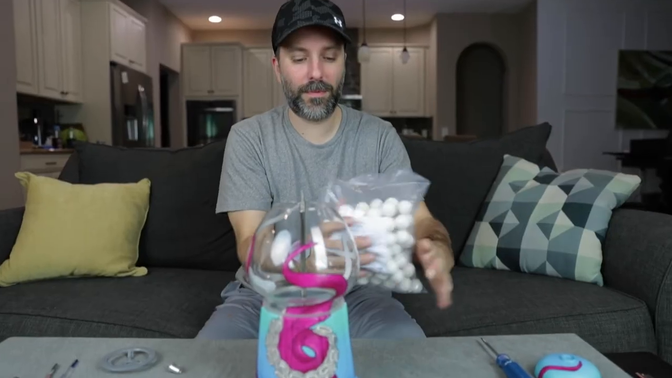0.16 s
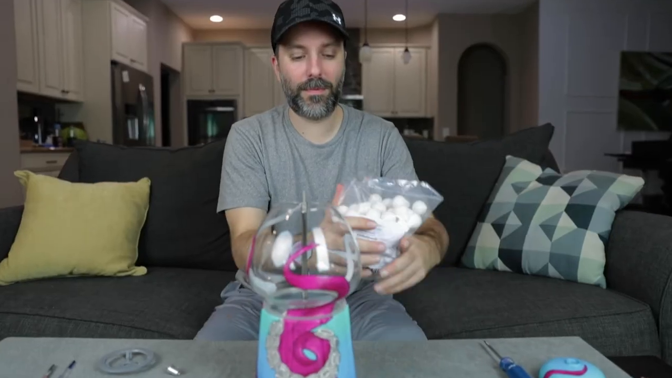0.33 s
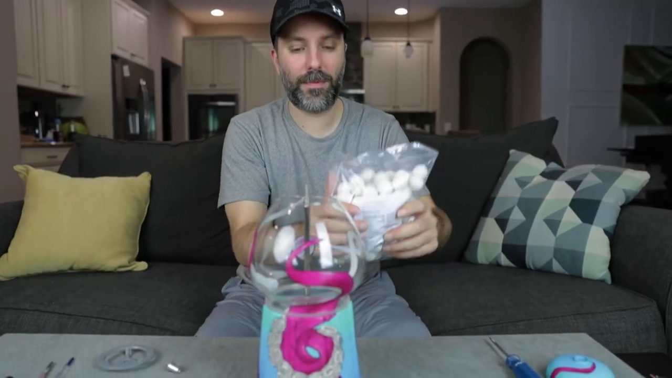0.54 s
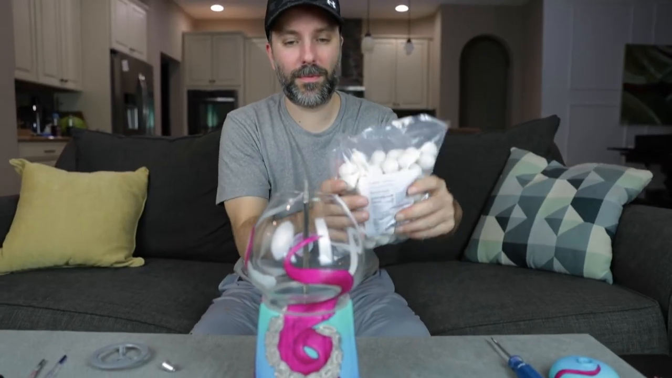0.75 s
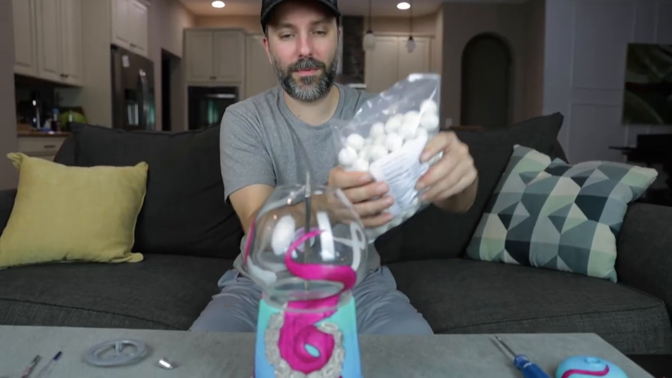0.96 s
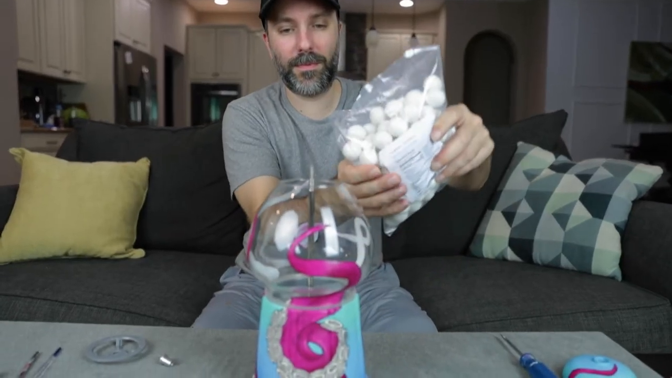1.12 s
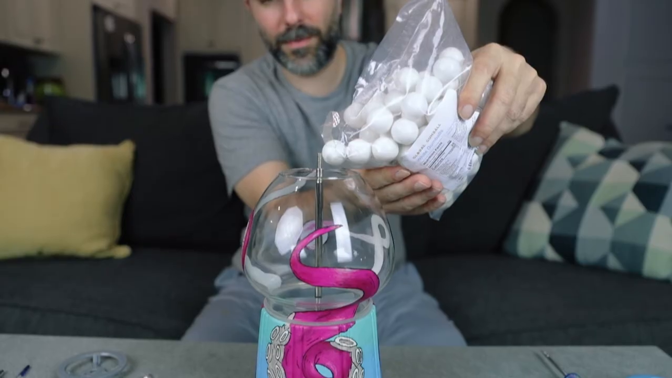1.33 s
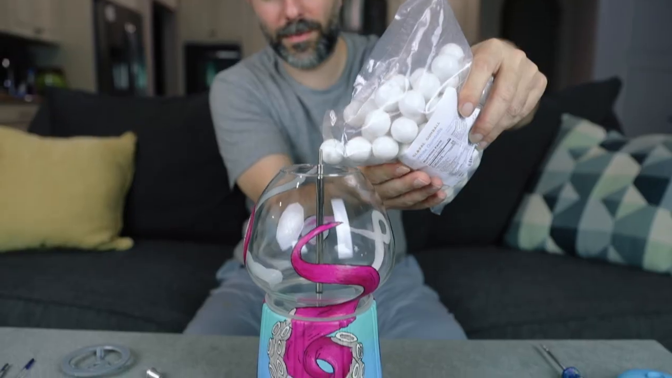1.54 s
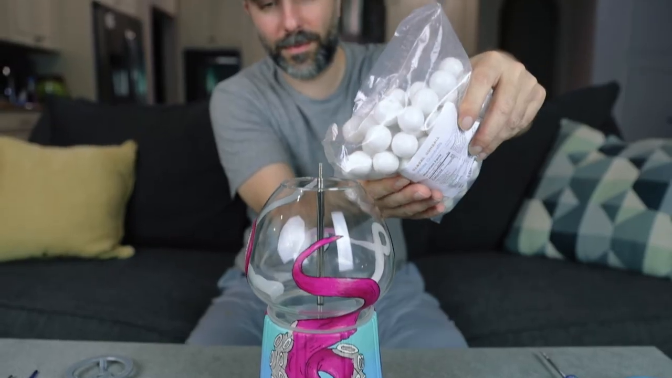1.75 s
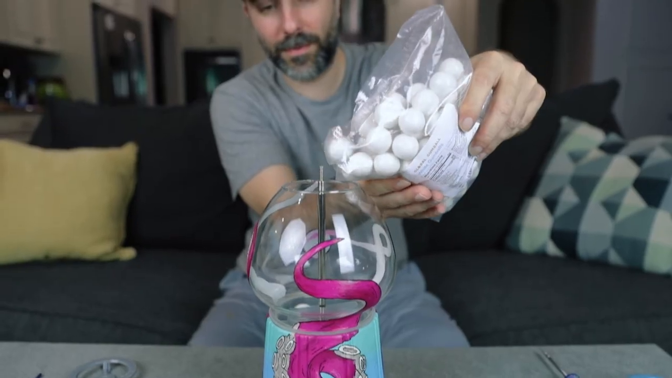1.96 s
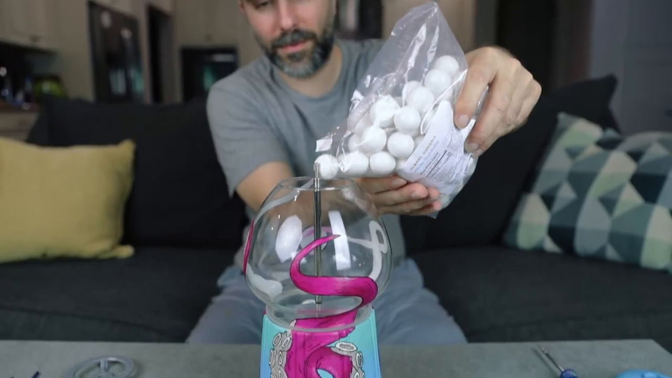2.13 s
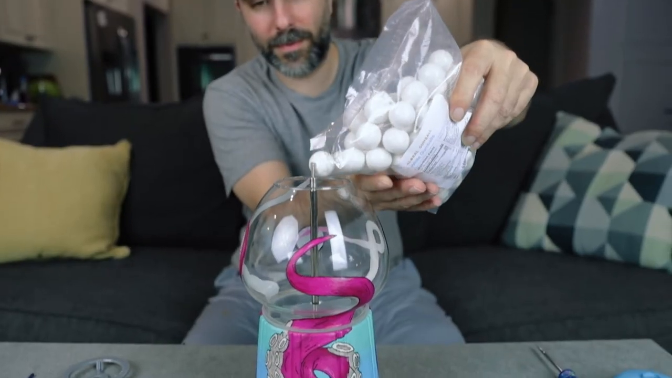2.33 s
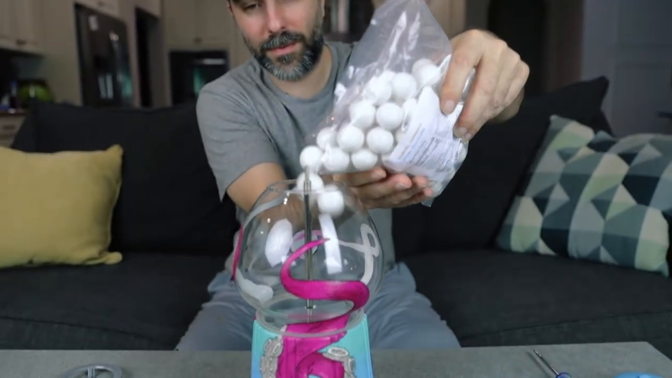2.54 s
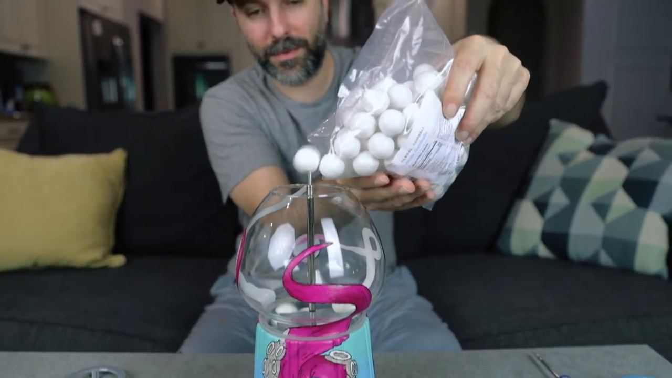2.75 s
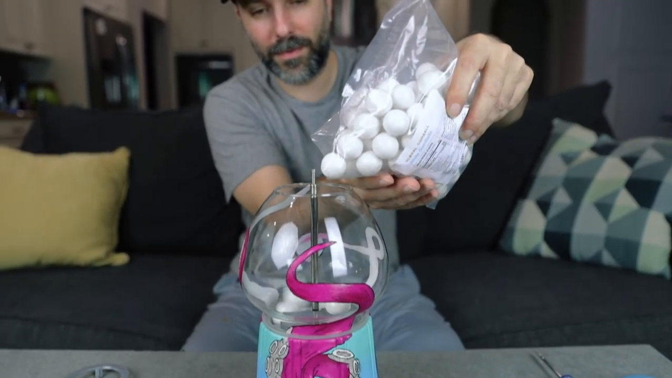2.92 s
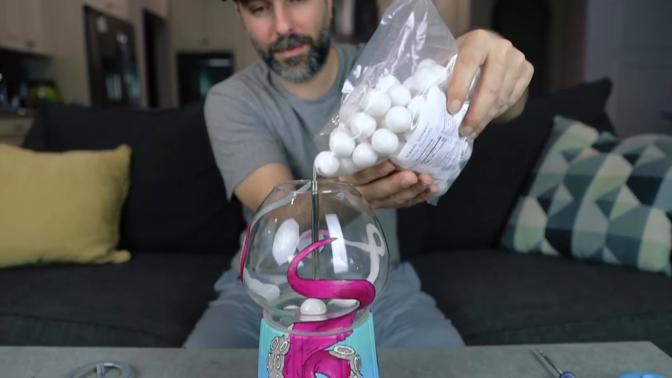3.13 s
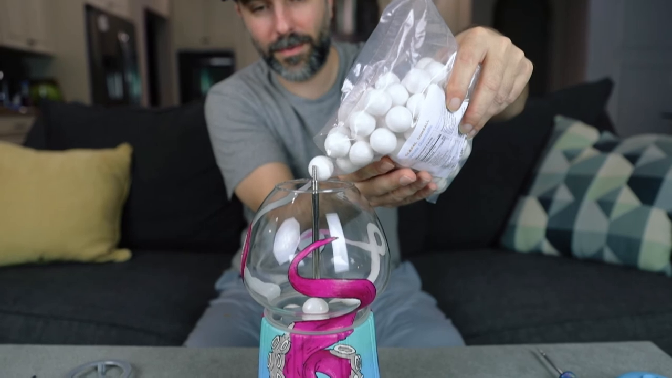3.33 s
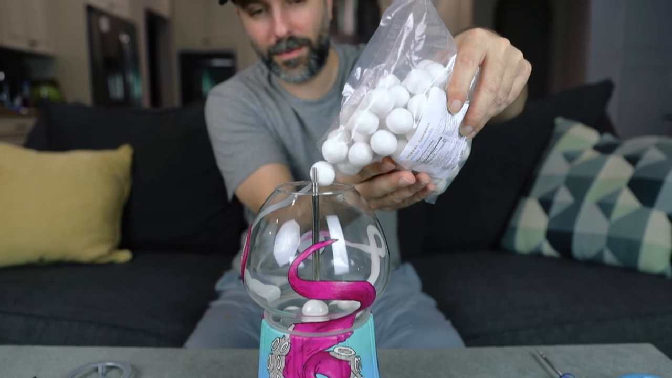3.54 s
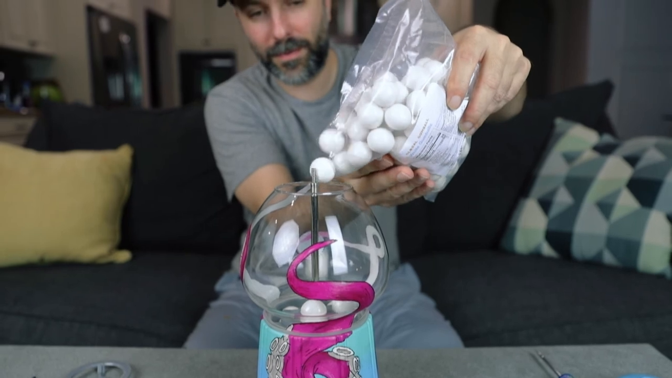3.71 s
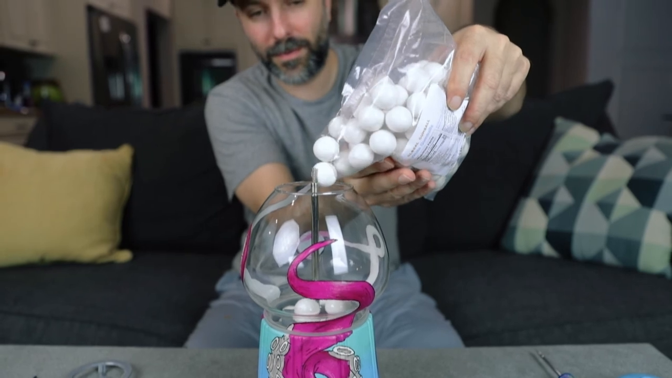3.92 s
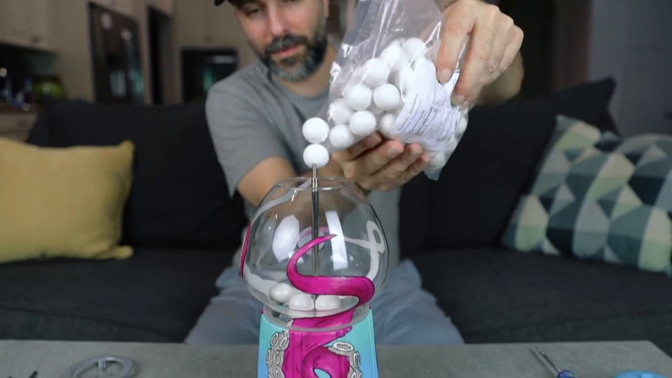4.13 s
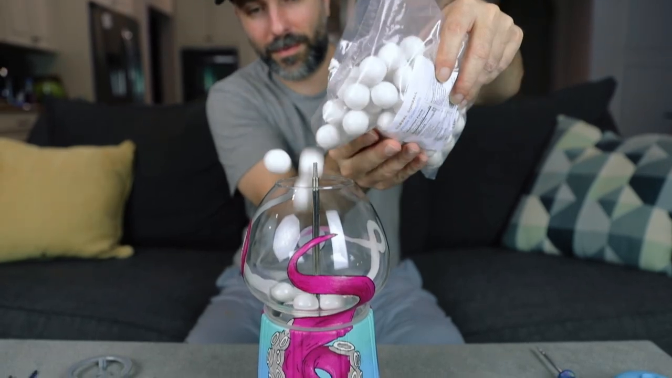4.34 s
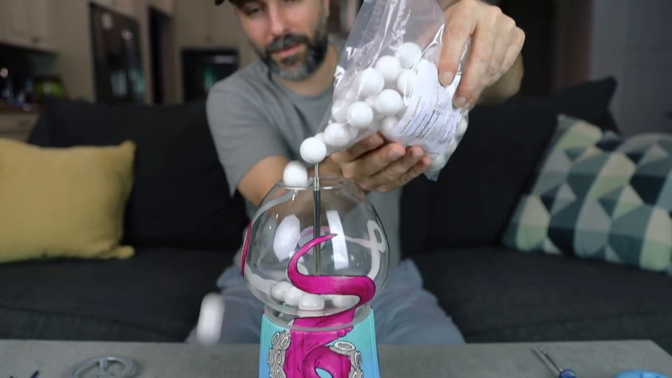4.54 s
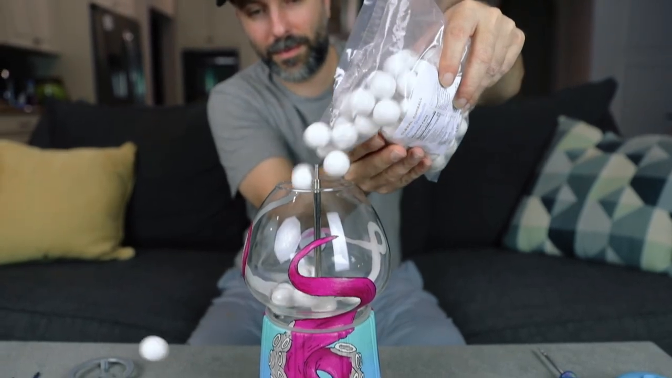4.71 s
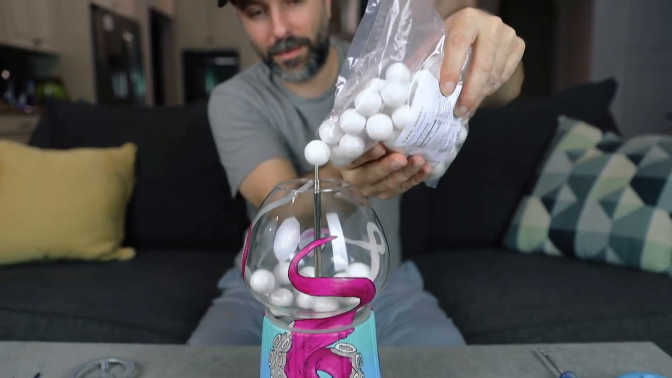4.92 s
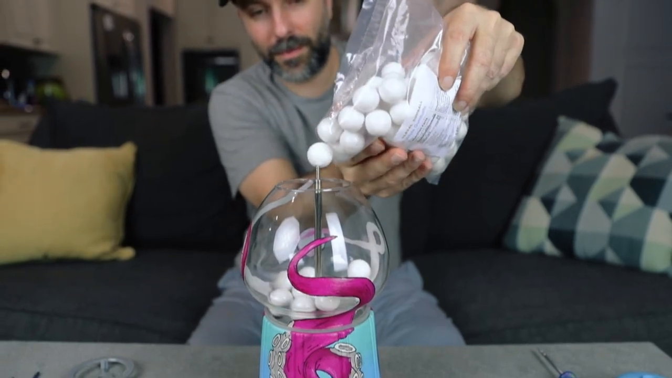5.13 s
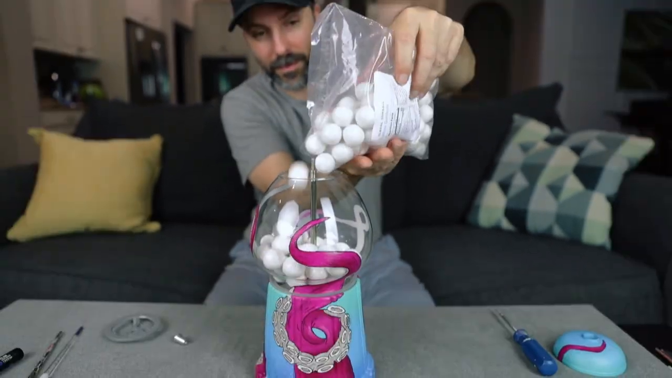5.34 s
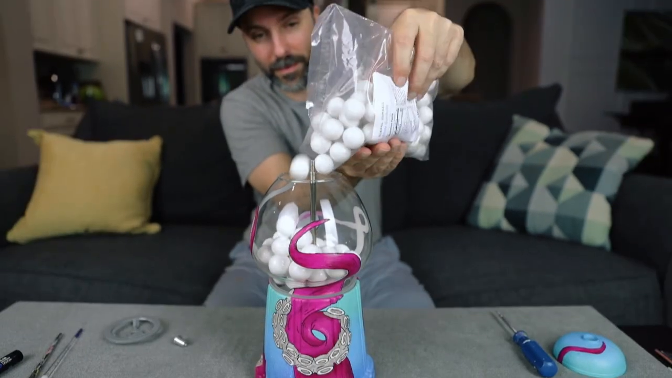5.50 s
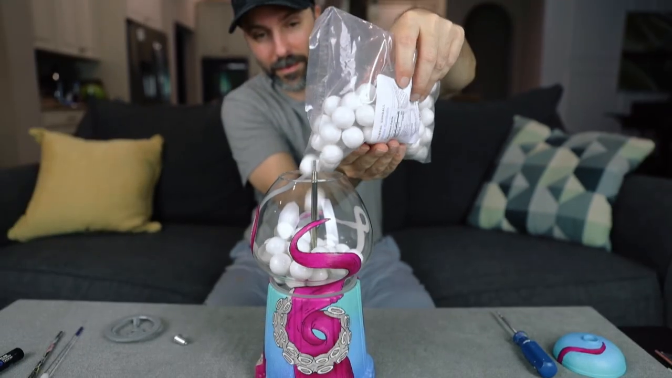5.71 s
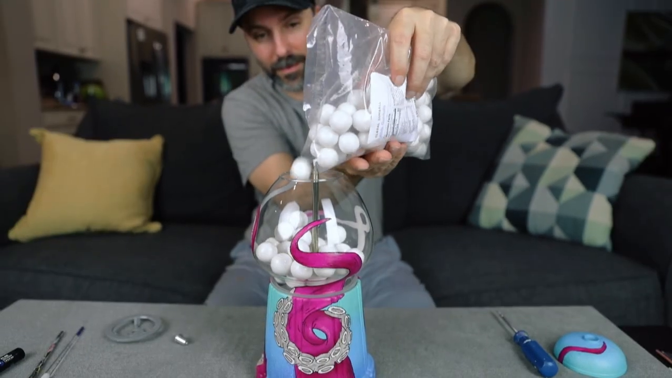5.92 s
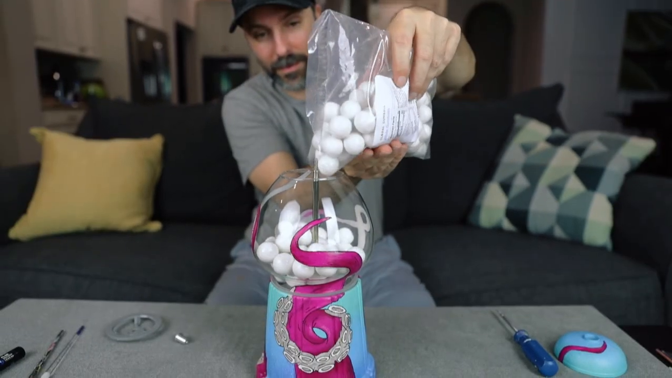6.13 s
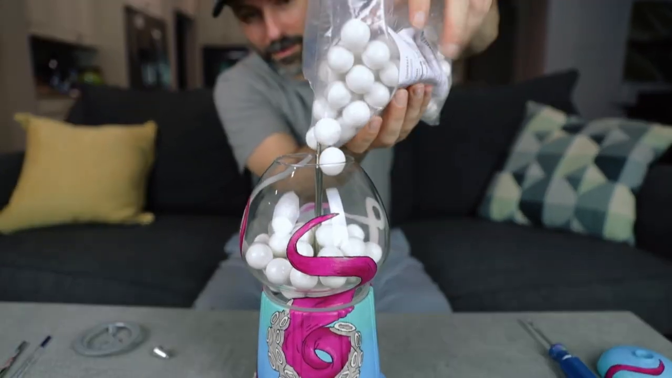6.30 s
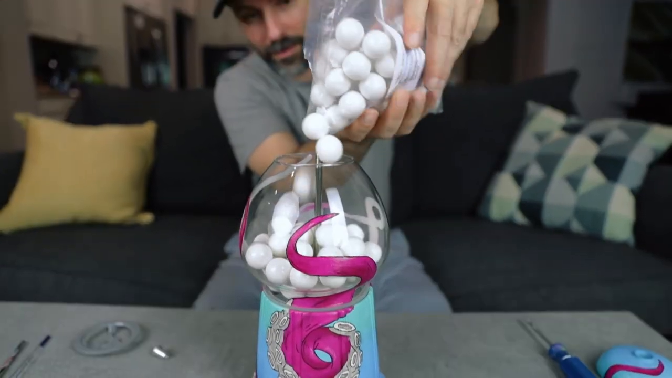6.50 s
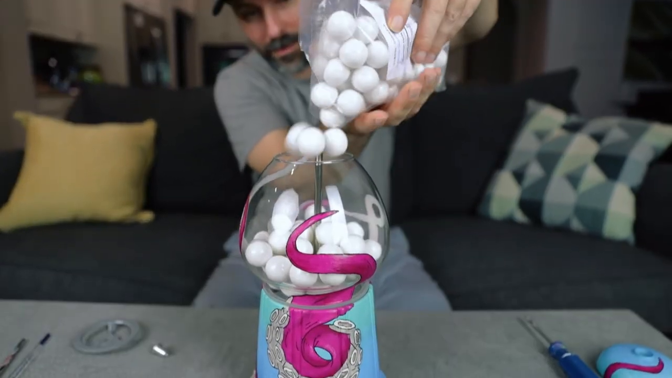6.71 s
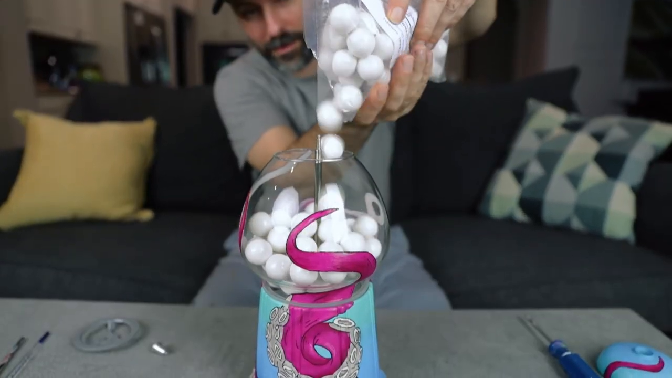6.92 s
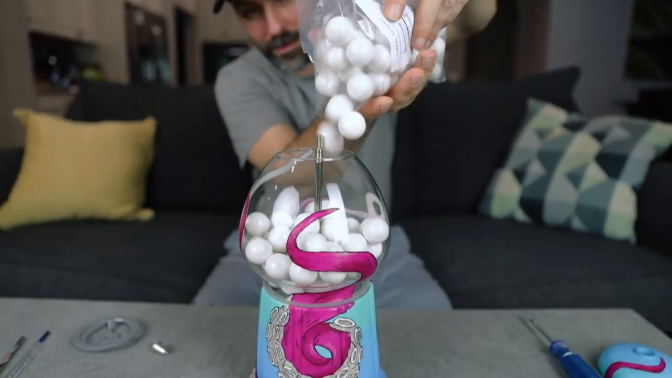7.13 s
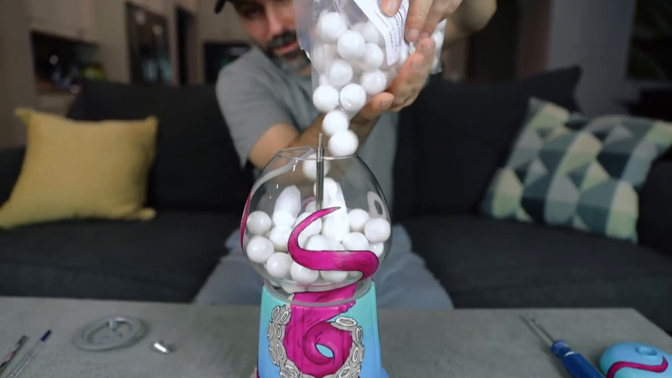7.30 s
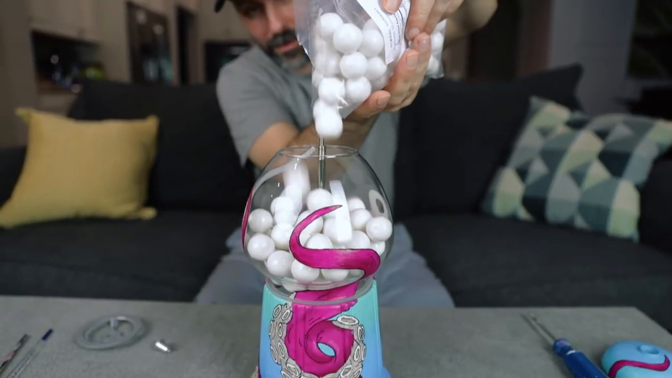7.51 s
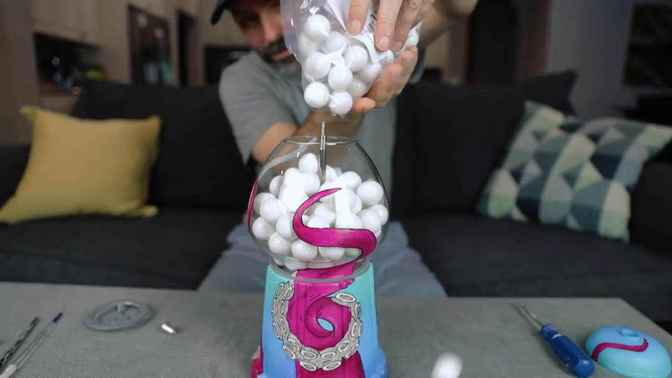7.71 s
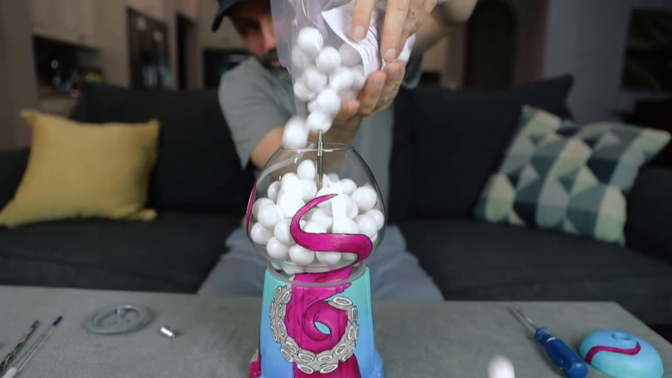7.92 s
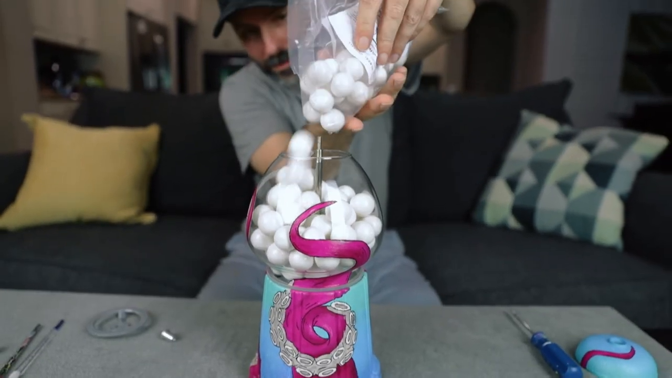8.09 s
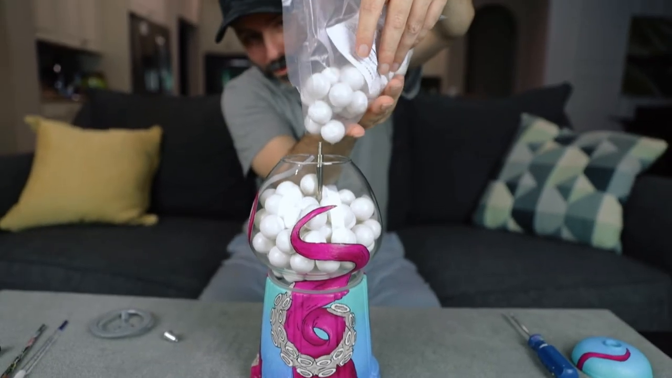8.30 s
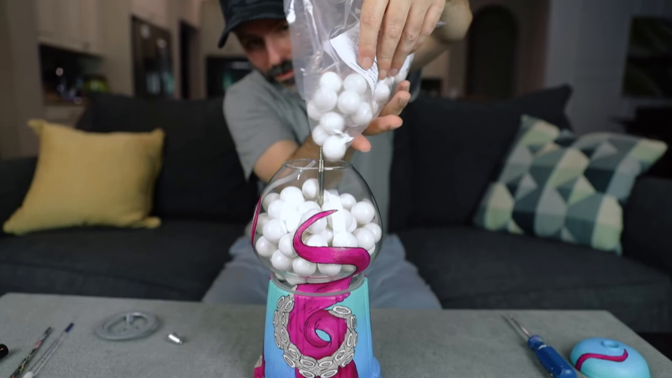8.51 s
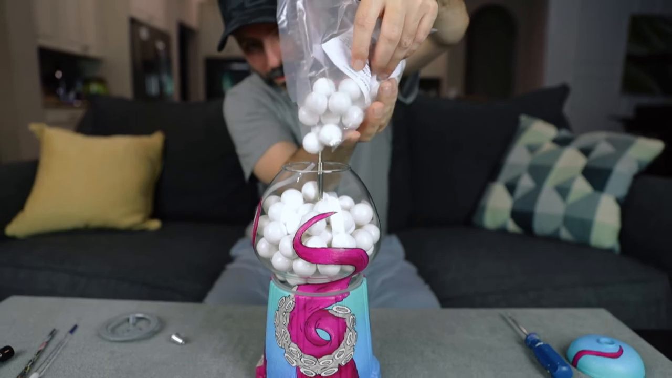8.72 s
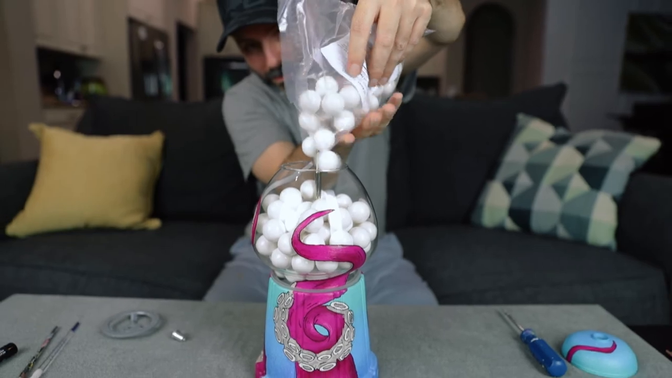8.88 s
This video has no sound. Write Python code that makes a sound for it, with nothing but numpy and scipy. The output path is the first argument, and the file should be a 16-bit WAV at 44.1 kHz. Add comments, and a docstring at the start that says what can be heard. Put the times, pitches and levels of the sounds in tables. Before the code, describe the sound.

Near microphone, modest room echo and faint hush. Film crinkles around jostling balls, then a few balls thump and clack onto the bare floor of a glass globe. Pouring becomes a fast irregular clatter with bell-like rim pings, each cut off by the next. A brief level dip comes before the first loud table bounce; a second stray follows late, as the fuller globe sounds drier and crackling plastic closes the scene.

```python
"""A bag of gumballs rustles and snaps in a living room: coloured noise driven by many tiny clicks.
From 1.9 s balls drop into a glass globe: clacks and glass modes, first with thumps of its plastic floor;
the growing heap damps the modes. Balls that hit the rim chime. The level dips briefly at 4.2 s.
At 4.7 s and 7.8 s stray balls bounce on the table, knocks loud enough to make the limiter duck."""
import sys
import numpy as np
from scipy import signal
from scipy.io import wavfile
from scipy.ndimage import uniform_filter1d

SR = 44100
rng = np.random.default_rng(int(sys.argv[2]) if len(sys.argv) > 2 else 0)


def wav_out(sig):
    """Save sig, one row per channel (or a flat mono array), as 16-bit PCM at SR to the path in sys.argv[1]."""
    wavfile.write(sys.argv[1], SR, np.round(np.clip(np.atleast_2d(sig).T, -1, 1) * 32767).astype(np.int16))


N = 394694
TIME = np.arange(N) / SR
BAND_EDGES_HZ = 22.2 * 2 ** (np.arange(20) / 2)

# Balls landing in the globe. Each row: start in s, blow on other balls in relative dB,
# blow on the glass in relative dB.
LANDINGS = [(1.871, -12, -17.5), (1.8823, -12.5, -12), (1.89, -8, -16.5), (1.952, -15.5, -23),
            (1.967, -20, -25), (2.0653, -21, -29.5), (2.3087, -23, -34), (2.7242, -2, -10),
            (2.779, -13, -22), (2.7909, -3.5, -14.5), (2.8302, -8.5, -11.5), (2.961, -15, -24),
            (2.9986, -8.5, -17), (3.007, -9, -16), (3.026, -16, -22), (3.0665, -12, -14),
            (3.3363, -21, -30), (3.5378, -26, -39), (3.8155, -11, -23), (3.8383, -11, -14),
            (3.892, -18, -33), (3.961, -21.5, -31), (4.0334, -22.5, -30.5), (4.476, -10, -17),
            (4.4863, -6, -15.5), (4.497, -7, -13), (4.5398, -5, -12.5), (4.5621, -6, -14.5),
            (4.6026, -7.5, -17), (4.7306, -0.5, -10), (4.7447, -12, -17), (4.796, -4, -9),
            (4.8572, -16, -15.5), (4.8959, -3, -12.5), (4.9339, -9, -8.5), (4.9581, 3, -4.5),
            (5.002, -12, -9.5), (5.0275, -4, -7.5), (5.0693, -6, -15.5), (5.0989, -14, -19),
            (5.249, -13, -25), (5.471, -8.5, -18.5), (5.4946, -4, -16.5), (5.658, -10, -14),
            (5.69, -12, -19.5), (5.7118, -12.5, -21), (5.7697, -13, -21.5), (5.8238, -8, -15.5),
            (5.8517, -12, -19.5), (5.879, -7.5, -11), (5.9267, -12, -19), (5.9478, -18, -17),
            (6.0718, -7, -15), (6.099, -9.5, -13), (6.1432, -12, -18.5), (6.175, -13.5, -22),
            (6.1915, -9, -19.5), (6.6127, -8, -15.5), (6.6343, -10.5, -24), (6.6797, -12.5, -20),
            (6.7079, -19, -17), (6.736, -12, -13), (6.873, -3, -16.5), (6.8925, -12, -16),
            (6.9042, -6, -10), (6.922, -13, -12.5), (6.984, -12, -15), (7.001, -8, -8.5),
            (7.081, -2.5, -12.5), (7.0967, -8, -13), (7.128, -14, -8.5), (7.1588, -16, -14.5),
            (7.2752, -9, -13), (7.2993, -16, -18), (7.3372, -4, -12.5), (7.3583, -15, -14.5),
            (7.4064, -7.5, -16), (7.452, -7.5, -16), (7.4641, -4, -8.5), (7.5308, -4, -10),
            (7.598, -3.5, -13), (7.658, -13, -12.5), (7.6853, -7, -17), (7.756, -8, -15), (8.1105, -9, -25),
            (8.1548, -15, -27), (8.1888, -11, -9.5), (8.2121, -14, -11.5), (8.2295, -12, -16),
            (8.2575, -24, -15.5), (8.286, -13, -17.5), (8.659, -8, -20), (8.6922, -8.5, -12)]
# How well a blow rings the bowl, poorly on the bare floor and on a high heap. Each row: time in s, gain in dB.
BOWL_RING = [(2.7, -12), (2.85, 1.5), (3.3, 5), (4.0, 5), (4.5, 1.5), (5.0, 6.5), (6.0, 1.5), (7.3, -2.5),
             (8.2, -13)]
# Modes of the bowl struck from within, of a sugar shell and of the stand. Each row: frequency in Hz,
# level in relative dB, undamped t60 in s, added decay in dB/s when full.
BOWL_MODES = [(1554, -11, 0.13, 152), (1610.4, -12, 0.18, 404), (3600, -11, 0.14, 600.5),
              (4280, -8.5, 0.13, 299), (4370, -11.5, 0.43, 597), (4264, -1.5, 0.054, 103.5),
              (4330, -1.5, 0.08, 200.5), (4480, -10, 0.021, 200), (4466, -7, 0.14, 596),
              (7870, -13, 0.078, 404.5), (7650, -23, 0.13, 396.5), (8640, -16, 0.043, 406),
              (11450, -23.5, 0.067, 403.5)]
SHELL_MODES = [(9060, 1, 0.054, 7), (11600, -0.5, 0.039, -2), (13600, -6, 0.049, 6)]
STAND_MODES = [(109.7, -3.5, 0.2, 0.012), (118.2, 0, 0.33, 0), (140.8, -1.5, 0.23, 0)]
# Colour of the globe's thud. Each row: frequency in Hz, relative density in dB per Hz.
THUD_COLOUR = [(40, -26), (80, -15.5), (120, 16), (180, -13), (300, 2.5), (500, 10), (800, 4.5),
               (1400, -15)]
BRIGHTENING_DB_PER_DB, USUAL_BLOW_DB = 0.46, -13.5  # extra treble per dB above the usual blow
THUD_GROWTH_DB_PER_DB, FULL_HEAP_WEIGHT_DB = 0.24, 2  # hard blows and a heavy heap rock the globe more


def landings():
    """Each ball clacks on its neighbours, rings the bowl and its own shell, and rocks the stand."""
    s, clack_db, glass_db = np.transpose(LANDINGS)
    crack_db = glass_db + BRIGHTENING_DB_PER_DB * (glass_db - USUAL_BLOW_DB)
    blow_db = (clack_db + glass_db) / 2
    growth_db = THUD_GROWTH_DB_PER_DB * (blow_db - USUAL_BLOW_DB)
    weight_db = blow_db + growth_db + FULL_HEAP_WEIGHT_DB * at_time(FILL, s)
    thud = from_db(-17.5) * noise(bursts(s, weight_db, t60_s=0.13), THUD_COLOUR)
    glass, shells, stand = np.zeros((3, N))
    for at, db, high_db, low_db in zip(s, glass_db, crack_db, weight_db):
        bowl_db = db + at_time(BOWL_RING, at)
        add(glass, at, from_db(bowl_db) * ring(BOWL_MODES, at, scatter_db=2.0, detune=0.00417))
        add(stand, at, from_db(low_db) * ring(STAND_MODES, at, scatter_db=1.5, detune=0.038))
        # no two balls are alike, so each shell pings at pitches of its own
        add(shells, at, from_db(high_db) * ring(SHELL_MODES, at, scatter_db=3, detune=.035))
    clatter = contacts(s[:, None], clack_db[:, None], crack_db[:, None])
    return clatter + thud + from_db(-2.0) * glass + from_db(-23) * stand + from_db(-11.5) * shells


# Colours of clacking shells and of sharp cracks. Each row: frequency in Hz, relative density in dB per Hz.
CLACK_COLOUR = [(500, -15.5), (900, -11), (1600, 0.5), (2300, -3.5), (3300, 4.5), (4300, -13.5),
                (5500, -20), (7500, -8.5), (12000, -66)]
CRACK_COLOUR = [(3500, -13.5), (6000, -1.5), (8500, 8.5), (10000, -4.5), (11500, -1), (13000, -5),
                (16000, -3.5)]
REBOUND_DB, SETTLE_DB = -7.5, -15  # loudest cases, re the first blow
MAX_EXTRA_LOSS_DB = 8.5
SETTLE_GAP_S = 0.046  # times 0.3 to 1.3


def contacts(s, clack_db, crack_db, count=2):
    """Sugar shells clack and crack, rebound at once on their neighbours, then settle; one row per ball."""
    chance = rng.random((len(s), 4, count))
    rebounds = s + np.cumsum(0.0023 + 0.0096 * chance[:, 0], axis=1)
    settling = s + np.cumsum(SETTLE_GAP_S * (.3 + chance[:, 2]), axis=1)
    times = np.hstack([s, rebounds, settling])
    rebound_db = REBOUND_DB - MAX_EXTRA_LOSS_DB * chance[:, 1]
    settle_db = SETTLE_DB - MAX_EXTRA_LOSS_DB * chance[:, 3]
    loss_db = np.hstack([0 * s, rebound_db, settle_db])
    clack = from_db(-5.5) * noise(bursts(times, clack_db + loss_db, t60_s=0.034), CLACK_COLOUR)
    # hard shells meet with a very short tick; the dense high modes of the glass sizzle on after it
    tick = bursts(times, crack_db + loss_db, t60_s=0.0015)
    sizzle = from_db(-8.5) ** 2 * bursts(s, crack_db, t60_s=0.056)
    return clack + noise(tick + sizzle, CRACK_COLOUR)


# Height of the heap. Each row: time in s, share of the globe filled.
FILL = [(2.9, 0), (4.4, .07), (5.0, .19), (5.5, .42), (6.0, .55), (8.3, 1.0)]


def ring(modes, s, scatter_db, detune, grip_db=0):
    """One blow: contact point weights the modes; the heap and a ball that stays in touch damp them."""
    out, fill = np.zeros(2 * SR), max(at_time(FILL, s), 0)
    draws = rng.standard_normal((len(modes), 3))
    for (hz, db, t60_s, full_db_per_s), (weight, shift, side) in zip(modes, draws):
        fall_db_per_s = (60 / t60_s + full_db_per_s * fill) * from_db(grip_db)
        t = TIME[:min(len(out), int(70 / fall_db_per_s * SR))]
        envelope = np.sign(side) * from_db(db + scatter_db * weight - fall_db_per_s * t)
        out[:len(t)] += envelope * np.sin(2 * np.pi * hz * (1 + detune * shift) * t)
    return out


# Balls striking the rim. Each row: start in s, chime in relative dB, lowest mode in relative dB.
RIM_STRIKES = [(1.8822, -45, -41.5), (2.8879, -9, -18.5), (3.8157, -43, -33), (4.3939, -7, -13.5),
               (4.4768, -18.5, -20.5), (4.527, -10.5, -12.5), (4.7771, -2, -11.5), (4.8721, -15, -14.5),
               (4.9319, -21, -11.5), (5.028, -32, -15.5), (5.471, -31, -25.5), (5.88, -24, -20),
               (6.106, -19.5, -22), (6.4672, -31, -31.5), (6.7368, -15.5, -34), (6.8244, -18.5, -23.5),
               (6.8936, -20, -21.5), (6.945, -11, -23.5), (6.9848, -12, -16), (7.1278, -16.5, -17),
               (7.222, -10, -19), (7.2634, -10, -18.5), (7.363, -19, -26), (7.489, -5.5, -15.5),
               (7.556, -8, -18), (7.6301, -5.5, -18.5), (7.754, -22, -28), (8.0131, -4.5, -37),
               (8.049, -6, -39), (8.1763, -10, -19), (8.2284, -13.5, -22.5), (8.5212, -36, -60),
               (8.6905, -18.5, -38)]
# How much the striking balls cling to the rim. Each row: time in s, change of decay rate in dB.
RIM_GRIP = [(2.89, 6.5), (4.39, -4), (4.78, 4), (6.74, 3), (7.22, -1.5), (8.05, 4.5)]
# Modes of the rim. Each row: frequency in Hz, level in relative dB, undamped t60 in s,
# added decay in dB/s when full.
RIM_LOW_MODES = [(1006.6, 0, 1.19, 508)]
RIM_CHIME_MODES = [(2817.5, 0, 0.58, 60)]
RIM_UPPER_MODES = [(3500, -31, 0.092, 100), (5070, 1.5, 0.31, 205), (5550, -12, .12, 200),
                   (7310, -2, 0.052, 100), (7390, 0, 0.07, 85), (8300, -20, .15, 100),
                   (8840, -11, 0.16, 84), (9260, -17, .07, 100), (10000, -18, 0.07, 100),
                   (11900, -11, 0.082, 100), (11800, -28, .1, 97), (12900, -22, 0.091, 100),
                   (14600, -34, .1, 100)]
RIM_UPPER_DB = -5.5  # re the listed chime
RIM_FREE_S, CHOKE_DB_PER_S = .07, 120  # after this time the chime falls faster


def rim():
    """The rim chimes like a bell; each new ball stops the old ringing and starts it afresh."""
    out = np.zeros(N)
    ends = [row[0] for row in RIM_STRIKES[1:]] + [N / SR]
    choke = from_db(-CHOKE_DB_PER_S * np.maximum(TIME[:2 * SR] - RIM_FREE_S, 0))
    for (s, chime_db, low_db), end in zip(RIM_STRIKES, ends):
        grip_db = at_time(RIM_GRIP, s)
        chime = ring(RIM_CHIME_MODES, s, scatter_db=3.0, detune=0.0015, grip_db=grip_db)
        chime = from_db(chime_db + 2.0) * chime
        low = from_db(low_db + 2.0) * ring(RIM_LOW_MODES, s, scatter_db=0.04, detune=0.0025)
        upper = ring(RIM_UPPER_MODES, s, scatter_db=3.0, detune=0.00041, grip_db=grip_db)
        upper = from_db(chime_db + RIM_UPPER_DB) * upper
        still_free = np.clip((end - s - TIME[:len(chime)]) / 0.0012 + 1, 0, 1)
        add(out, s, (chime * choke + upper + low) * still_free)
    return out


RIM_CLACK_DB, RIM_CRACK_DB = -4, -5  # re the listed chime


def rim_clacks():
    """The shells of the balls that strike the rim clack as well."""
    s, chime_db, _ = np.transpose(RIM_STRIKES)[:, :, None]
    return contacts(s, chime_db + RIM_CLACK_DB, chime_db + RIM_CRACK_DB)


# Balls dropping on the bare plastic floor of the globe. Each row: start in s, level in relative dB.
FLOOR_DROPS = [(1.879, -2), (1.967, -7.5), (2.307, -21.5), (2.726, 3.5), (2.793, 1), (2.83, -7),
               (2.996, -6), (3.026, -7), (3.817, -10.5)]
# Modes of the plastic floor. Each row: frequency in Hz, level in relative dB, undamped t60 in s,
# added decay in dB/s when full.
PLASTIC_MODES = [(423, -7.5, 0.056, 0), (488, -4.5, 0.078, 1), (480, -17, 0.31, 0.39),
                 (538, -10, 0.076, 0.098)]


def plastic_floor():
    """Short low modes give a hollow thump while the floor of the globe is still bare."""
    out = np.zeros(N)
    for s, db in FLOOR_DROPS:
        add(out, s, from_db(db - 6.5) * ring(PLASTIC_MODES, s, scatter_db=0.0, detune=0.02))
    return out


# Stray balls bouncing on the table. Each row: start in s, level in relative dB.
TABLE_BOUNCES = [(4.6814, 11.5), (4.950, 8.5), (5.110, -2.5), (5.208, -11.5), (5.276, -22), (7.7706, 8.5),
                 (8.0384, 3.5), (8.196, -3.5), (8.287, -9)]
# Modes of the table top. Each row: frequency in Hz, level in relative dB, undamped t60 in s,
# added decay in dB/s when full.
TABLE_MODES = [(323, -11, 0.055, 0), (613, -4.5, 0.041, 0.0074), (792, -5, 0.051, 0.0072),
               (1265, 0, 0.018, 0), (1786, 2, 0.014, 0.015), (2340, -3.5, 0.015, 0.023)]
# Colour of the table's dense modes. Each row: frequency in Hz, relative density in dB per Hz.
KNOCK_COLOUR = [(30, -34), (100, -7), (250, 1), (600, 4), (1300, 0.5), (2300, -4), (3200, -8.5),
                (5000, -21), (12000, -33)]


def table():
    """A hard knock: the tick of the shell, then a few short modes of the top over many dense ones."""
    times, levels_db = np.transpose(TABLE_BOUNCES)
    out = from_db(-7) * noise(bursts(times, levels_db, t60_s=0.042), KNOCK_COLOUR)
    out += from_db(-15) * noise(bursts(times, levels_db, t60_s=0.0048), CRACK_COLOUR)
    for s, db in TABLE_BOUNCES:
        add(out, s, from_db(db - 8.5) * ring(TABLE_MODES, s, scatter_db=0.0, detune=0.062))
    return out


# Sharpest snaps of the bag and clicks of balls inside it. Each row: start in s, level in relative dB.
BAG_SNAPS = [(0.042, -12), (0.2829, -1.5), (0.606, -5), (0.7914, -13.5), (0.832, -16), (0.975, -14),
             (1.0181, -17), (1.194, -20.5), (1.3732, -23), (1.4846, -15), (1.542, -11), (1.7712, -25),
             (2.5413, -17.5), (2.5959, -17), (2.6755, -18), (3.2303, -8.5), (3.563, -16.5), (3.7253, -11.5),
             (3.7714, -6.5), (4.251, -10), (4.316, -8.5), (5.325, -4), (5.434, -9), (6.385, -15),
             (7.9778, -3.5), (8.4137, -4.5), (8.6228, -7), (8.7706, -4), (8.789, -5.5), (8.8959, -7)]
# Balls shifting in the bag bump against the palm. Each row: start in s, level in relative dB.
PALM_BUMPS = [(.035, -37), (.12, -33.5), (.28, -27), (.36, -35.5), (.5, -32.5), (.6, -32), (0.844, -43.5),
              (.98, -50), (1.192, -42.5), (1.27, -48), (1.486, -48), (1.548, -41), (2.545, -48.5),
              (3.565, -49.5), (3.727, -41.5)]
# Colours of the jostling balls and of the dull crumple. Each row: frequency in Hz,
# relative density in dB per Hz.
BAG_COLOUR = [(350, -36.5), (600, -9), (779, -13), (984, -4.5), (2070, -6.5), (3890, 3.5), (4910, -10.5),
              (5870, -5.5), (9890, -51), (14700, -41), (16000, -45)]
CRUMPLE_COLOUR = [(60, -39), (130, -21.5), (220, 9), (380, 14), (550, -4), (900, -35)]
AFTERSNAP_S, AFTERSNAP_DB = .015, -10.5  # a snapped fold springs once more; mean delay
CRUMPLE_DB = -19  # re the rustle
BUSY_DB = -33  # rustle level where single touches are half merged into a dense jostle


def bag(dull_hz=8500):
    """Balls touch in the film, singly or densely; the film muffles them, crumples and crackles."""
    rustle = handling()
    busy = rustle / (rustle + from_db(BUSY_DB) ** 2)
    dense = crinkle(per_s=500, spread_db=3.8, t60_s=.01)
    sparse = crinkle(per_s=170, spread_db=4, t60_s=.01)
    folds = crinkle(per_s=300, spread_db=3, t60_s=.03)
    creases = crinkle(per_s=35, spread_db=4, t60_s=.007)
    touches = busy * dense + (1 - busy) * sparse
    s, db = np.transpose(BAG_SNAPS)
    again = s + AFTERSNAP_S * (.5 + rng.random(len(s)))
    snaps = from_db(-14.5) ** 2 * bursts([s, again], [db, db + AFTERSNAP_DB], t60_s=0.023)
    bumps = bursts(*np.transpose(PALM_BUMPS), t60_s=0.092)
    film_low_pass = signal.butter(4, dull_hz, fs=SR, output="sos")
    jostle = signal.sosfilt(film_low_pass, noise(rustle * touches + snaps, BAG_COLOUR))
    crackle = from_db(-25.5) * noise(rustle * creases + snaps, CRACK_COLOUR)
    crumple = noise(from_db(CRUMPLE_DB) ** 2 * rustle * folds + bumps, CRUMPLE_COLOUR)
    return jostle + crackle + crumple


# Moves of the hands that lift, tip or shake the bag. Each row: start in s, hold in s, rustle in relative dB.
BAG_MOVES = [(0, 0.11, -36), (.1, 0.44, -29.5), (0.263, 0.024, -22), (.49, 0.13, -28), (.64, 0.09, -39),
             (.95, 0.08, -43.5), (1.2, 0.087, -42.5), (1.559, 0.015, -47), (2.0, 0.11, -44),
             (2.34, 0.04, -49), (2.55, .17, -46), (2.8, 0.4, -40), (3.57, .2, -49), (3.82, 0.15, -39),
             (4.5, .62, -31.5), (5.33, 0.19, -30), (5.63, .37, -28), (6.08, 0.33, -29), (6.27, 0.11, -29.5),
             (6.49, 0.23, -28.5), (6.88, .82, -25), (7.93, 0.42, -33.5), (8.544, 0.034, -32),
             (8.74, 0.1, -34.5), (8.901, .03, -37)]
MOVE_ATTACK_S, MOVE_RELEASE_DB_PER_S = 0.026, 189


def handling():
    """Power of the rustle: each move swells, holds and dies away."""
    power = 0
    for s, held_s, db in BAG_MOVES:
        release_db = MOVE_RELEASE_DB_PER_S * np.maximum(TIME - s - held_s, 0)
        swell = np.clip((TIME - s) / MOVE_ATTACK_S + .5, 0, 1)  # centred on s
        power = power + from_db(db - release_db) ** 2 * swell ** 2
    return power


def crinkle(per_s, spread_db, t60_s):
    """Power envelope of many tiny clicks of uneven size, with a mean near 1."""
    times = TIME[rng.random(N) < per_s / SR]
    sizes_db = spread_db * np.minimum(rng.exponential(1, len(times)), 4)
    power = bursts(times, sizes_db, t60_s)
    return power / (uniform_filter1d(power, size=4000) + 0.16 * power.mean())


# Decay of the room. Each row: frequency in Hz, t60 in s.
ROOM_T60 = [(100, 0.17), (500, 0.43), (1500, 0.54), (4000, 0.56), (8000, 0.4), (15000, 0.29)]


def room(x, first_echo_s=0.0026):
    """Diffuse echoes: decaying noise in bands, longest in the upper middle and shortest in the bass."""
    t, white = TIME[:SR], rng.standard_normal((2, SR))
    swell = np.clip(t / first_echo_s - 1, 0, 1)
    tail = np.zeros(SR)
    for k, (low, high) in enumerate(zip(BAND_EDGES_HZ, BAND_EDGES_HZ[1:])):
        decay = from_db(-60 * t / at_hz(ROOM_T60, np.sqrt(low * high)))
        tail += band(white[k % 2] * swell * decay, low, high)
    return signal.fftconvolve(x, tail / np.sqrt(np.sum(tail ** 2)))[:N]


# Colour of the quiet background. Each row: frequency in Hz, relative density in dB per Hz.
HUSH_COLOUR = [(30, -22), (70, -8), (110, 4), (250, -14.5), (1000, -4.5), (4000, -14), (8000, -30),
               (16000, -51.5)]


def hush():
    """Steady coloured noise of the quiet room."""
    return from_db(-81.0) * noise(np.ones(N), HUSH_COLOUR)


def noise(power, spectrum):
    """Coloured noise whose power follows the given envelope."""
    white = rng.standard_normal((2, N)) * np.sqrt(np.abs(power))
    gains = from_db(at_hz(spectrum, np.sqrt(BAND_EDGES_HZ[1:] * BAND_EDGES_HZ[:-1])))
    gains = gains / np.sqrt(np.sum(gains ** 2 * np.diff(BAND_EDGES_HZ)) * 2 / SR)
    return sum(gain * band(white[k % 2], BAND_EDGES_HZ[k], BAND_EDGES_HZ[k + 1])
               for k, gain in enumerate(gains))


def bursts(times, levels_db, t60_s):
    """Power envelope of blows that start at once and die away."""
    blows = np.zeros(N)
    starts = np.clip(np.round(np.ravel(times) * SR).astype(int), 0, N - 1)
    np.add.at(blows, starts, from_db(np.ravel(levels_db)) ** 2)
    pole = np.exp(-2 * np.log(1000) / (t60_s * SR))
    return signal.lfilter([1], [1, -pole], blows + 1e-18)


def band(x, low_hz, high_hz):
    """Causal band-pass."""
    sos = signal.butter(2, [low_hz, high_hz], "band", fs=SR, output="sos")
    return signal.sosfilt(sos, x + 1e-18)


def add(out, s, sound):
    """Mix a sound in from time s."""
    start = max(0, round(s * SR))
    out[start:start + len(sound)] += sound[:max(0, N - start)]


def at_time(rows, s):
    """Read a curve at the given times."""
    return np.interp(s, *np.transpose(rows))


def at_hz(points, hz):
    """Read a spectrum on a log-frequency axis."""
    freqs, values = np.transpose(points)
    return np.interp(np.log(hz), np.log(freqs), values)


def from_db(db):
    """Decibels to gain."""
    return 10 ** (np.asarray(db) / 20)


# Level, somewhat higher before the brief dip than after it. Each row: time in s, gain in dB re BASE_LEVEL_DB.
LEVEL_CURVE = [(4.165, 4.5), (4.172, -36), (4.24, -21), (4.31, -4.5), (4.37, -5), (4.39, 0)]
BASE_LEVEL_DB = -4


def scene():
    """Globe, table and bag close by with their echoes, at a level that dips briefly, over the hush."""
    balls = landings() + rim_clacks() + plastic_floor()
    chimes, knocks, film = rim(), table(), bag()
    to_room = from_db(-11.0) * balls + from_db(-21) * chimes + from_db(-6.5) * knocks + from_db(-11) * film
    echoes = room(to_room)
    level = from_db(BASE_LEVEL_DB + at_time(LEVEL_CURVE, TIME))
    return ((balls + chimes + knocks + film + echoes) * level + hush())[None]


def record(dry, low_cut_hz=70, high_cut_hz=15900, threshold_db=-4, release_db_per_s=130, attack_s=0.0023):
    """Deep bass is cut, a limiter ducks after the hardest blows, what slips past is clipped, top is cut."""
    thin = signal.sosfilt(signal.butter(2, low_cut_hz, "high", fs=SR, output="sos"), dry)
    over_db = np.maximum(20 * np.log10(np.abs(thin) + 1e-9) - threshold_db, 0)
    release_db = release_db_per_s * TIME
    held_db = np.maximum.accumulate(over_db + release_db, axis=1) - release_db
    pole = np.exp(-1 / (attack_s * SR))
    duck_db = signal.lfilter([1 - pole], [1, -pole], held_db)
    limited = thin * from_db(-duck_db)
    clipped = np.clip(limited, -.8, .8)
    return signal.sosfilt(signal.ellip(10, .3, 80, high_cut_hz, fs=SR, output="sos"), clipped)


dry = scene()
out = record(dry)
wav_out(out)
```